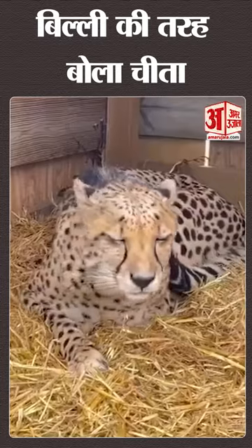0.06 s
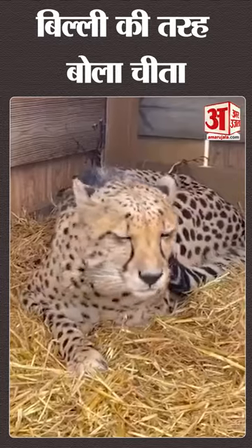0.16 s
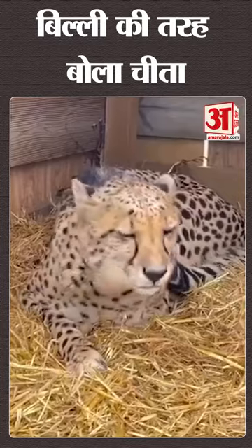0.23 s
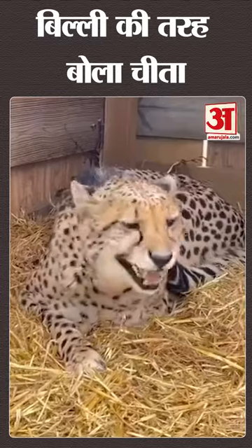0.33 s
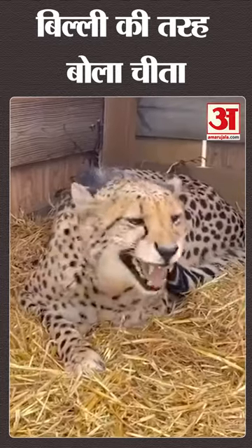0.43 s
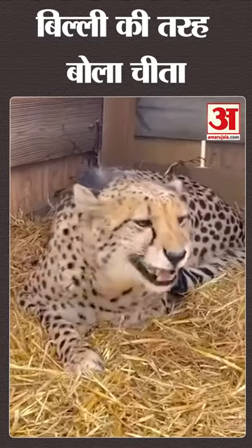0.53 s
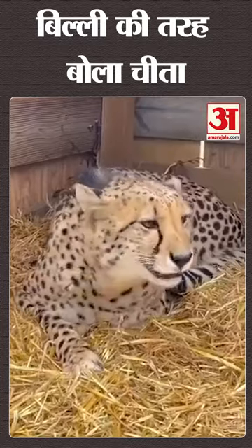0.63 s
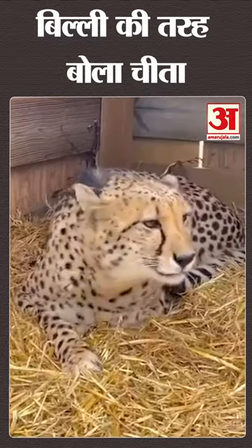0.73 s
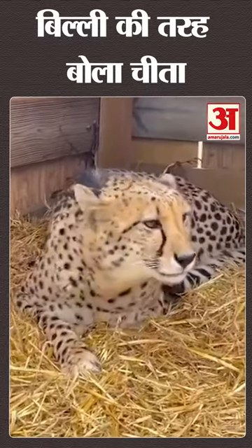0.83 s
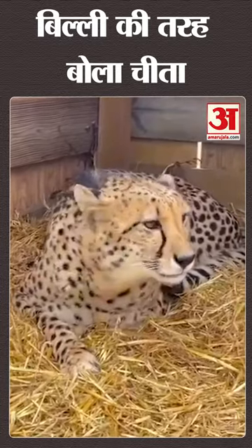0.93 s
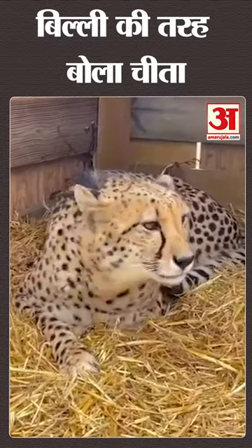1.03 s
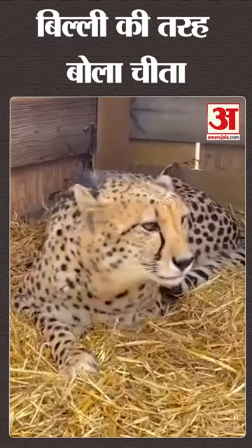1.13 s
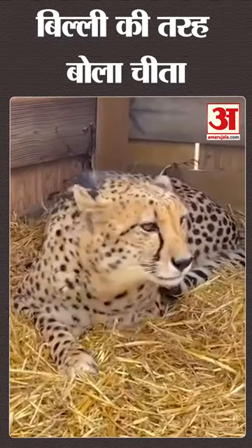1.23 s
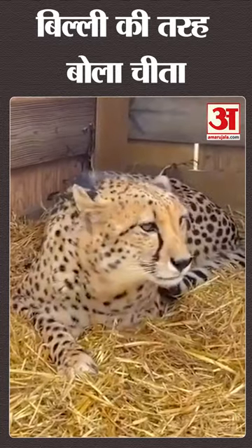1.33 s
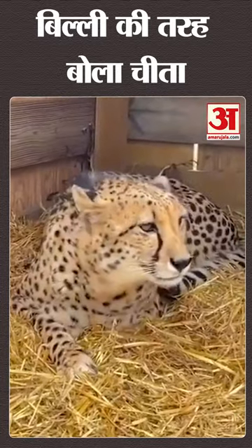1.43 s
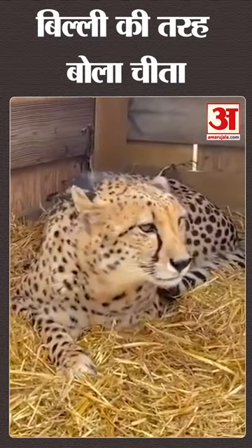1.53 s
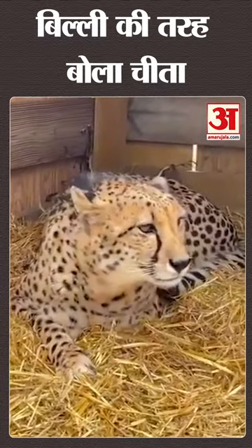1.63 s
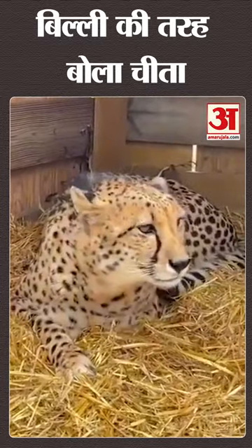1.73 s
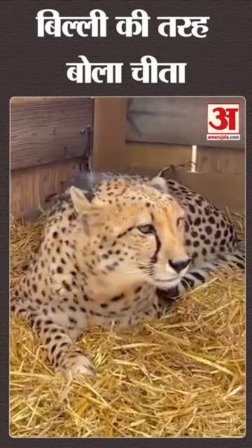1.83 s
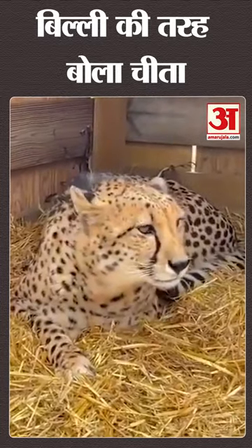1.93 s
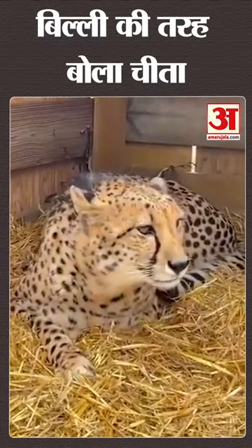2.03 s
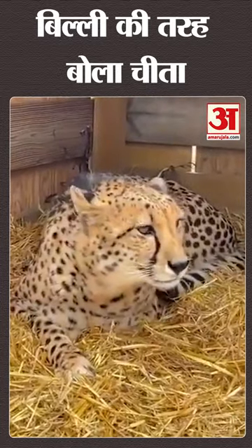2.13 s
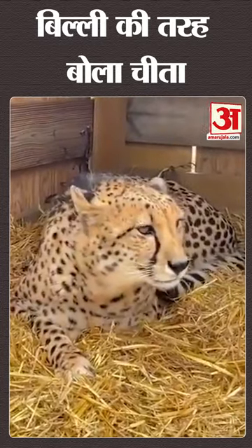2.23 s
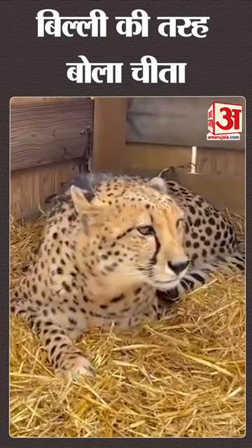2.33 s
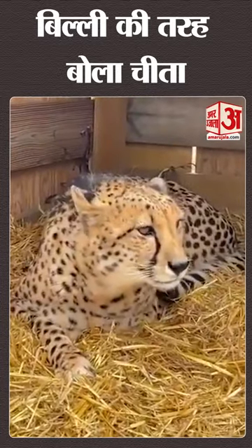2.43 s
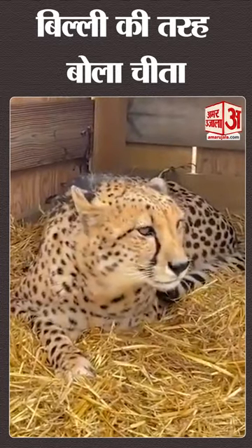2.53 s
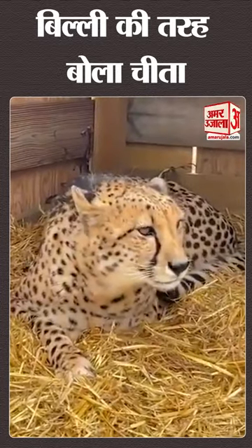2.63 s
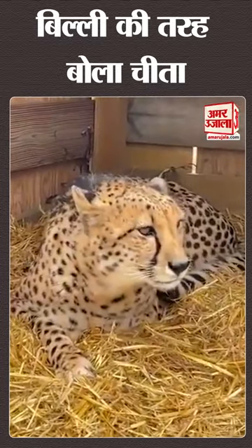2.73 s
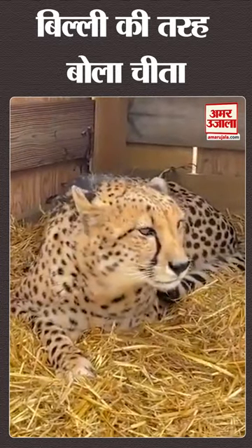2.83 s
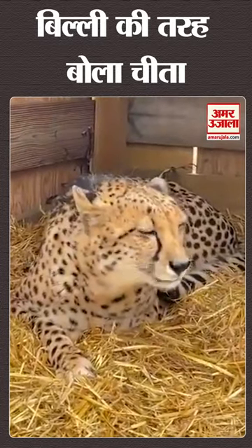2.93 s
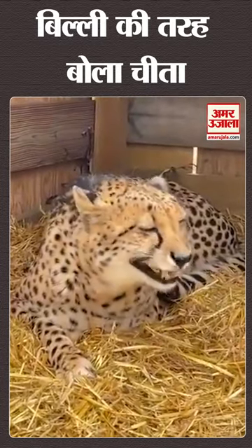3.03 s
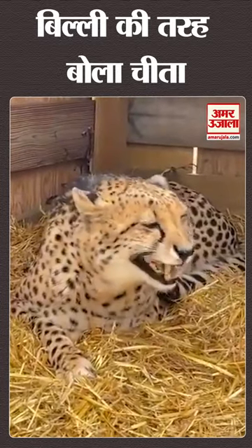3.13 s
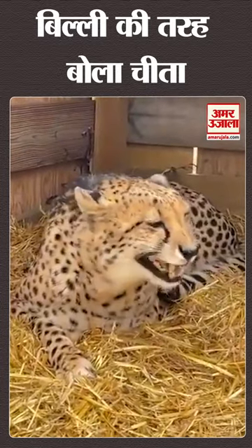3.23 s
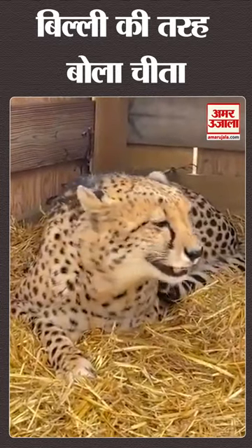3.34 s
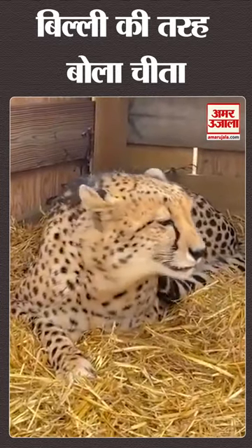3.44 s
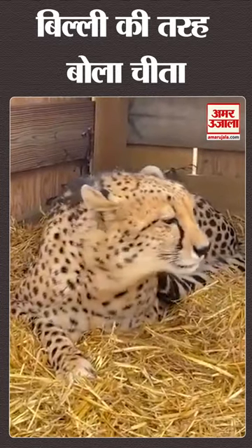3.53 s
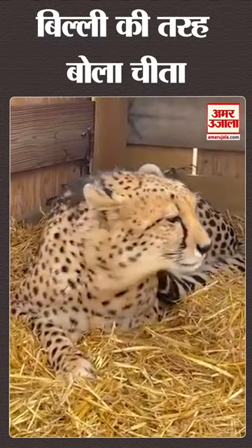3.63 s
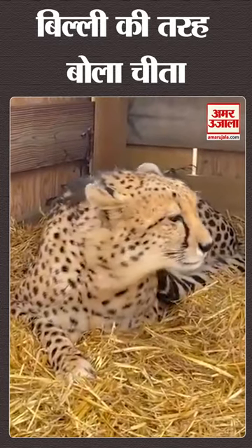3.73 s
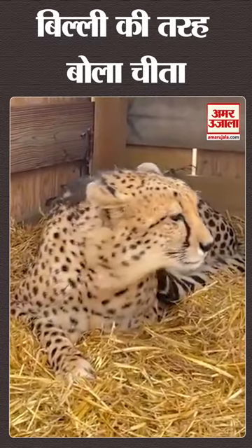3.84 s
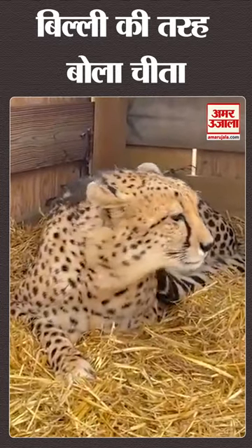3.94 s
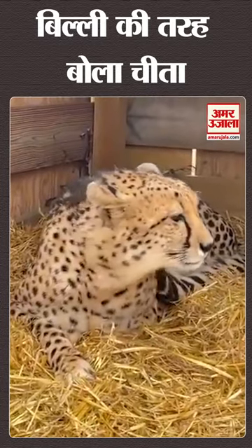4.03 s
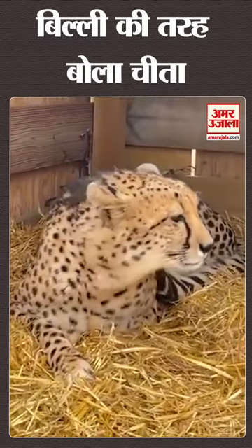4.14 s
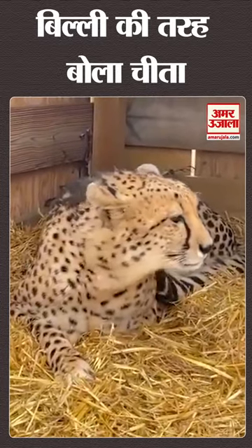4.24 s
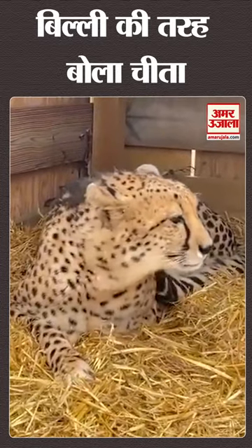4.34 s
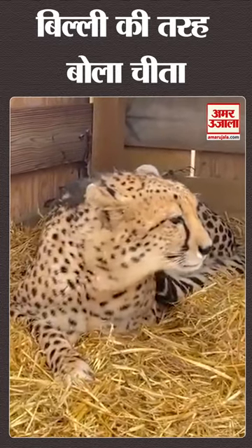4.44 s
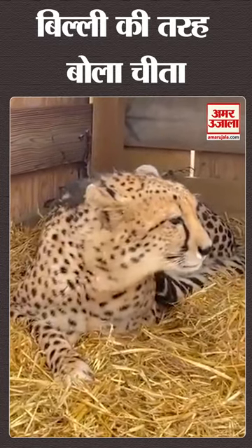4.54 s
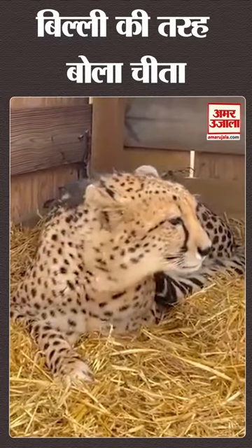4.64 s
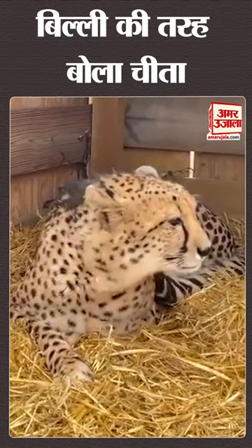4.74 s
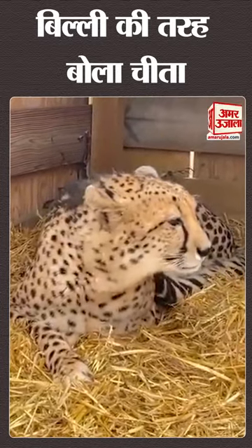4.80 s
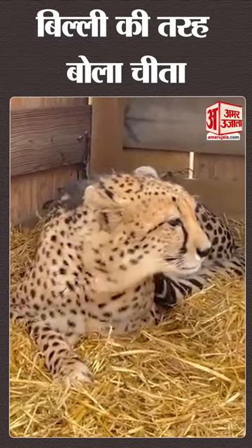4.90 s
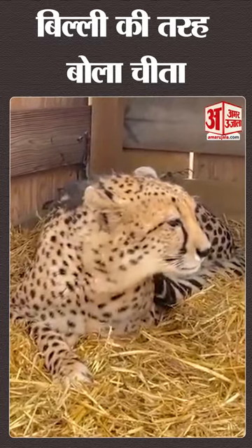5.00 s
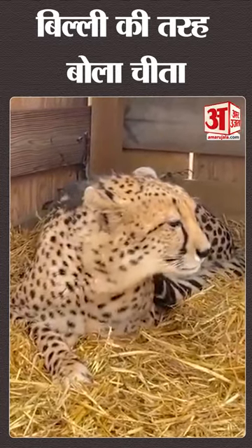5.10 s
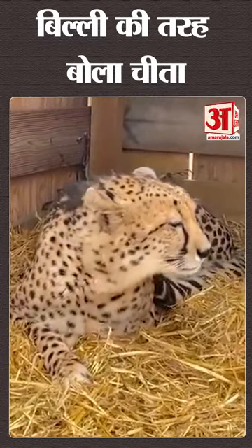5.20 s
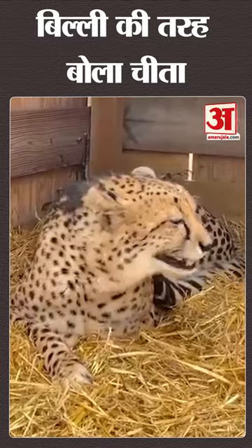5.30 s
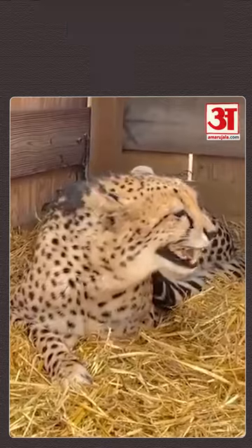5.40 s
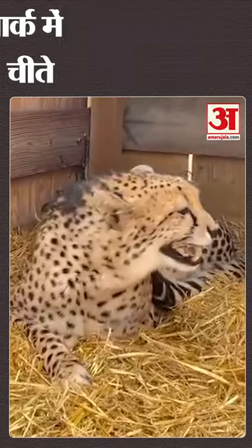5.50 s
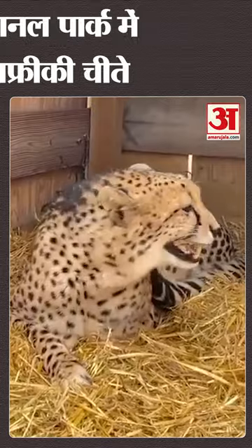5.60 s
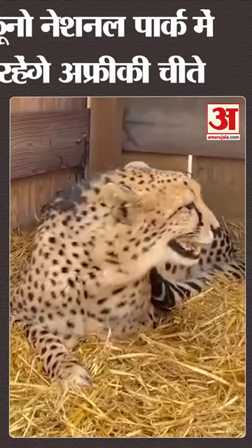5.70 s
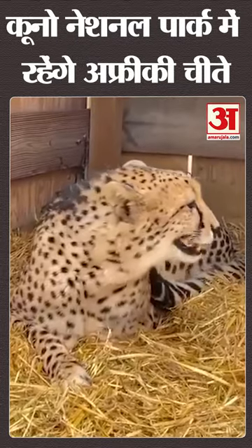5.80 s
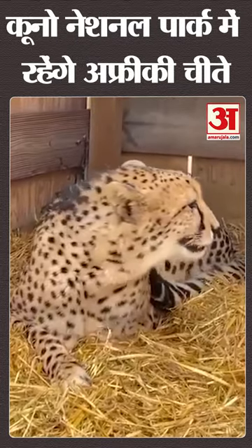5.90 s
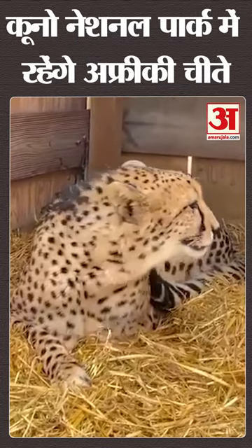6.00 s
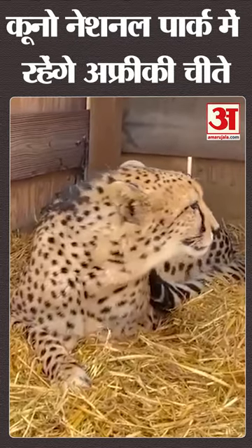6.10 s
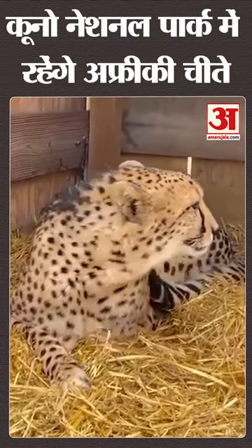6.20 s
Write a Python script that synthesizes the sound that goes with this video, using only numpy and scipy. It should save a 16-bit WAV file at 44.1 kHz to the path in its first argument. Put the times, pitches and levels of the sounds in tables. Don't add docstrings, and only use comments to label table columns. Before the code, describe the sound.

A cheetah gives three short, cat-like meows, each dropping in pitch, while a low engine hum outside fades into soft, lumpy idling.

```python
import sys
import numpy as np
from scipy import signal
from scipy.fft import rfft, irfft
from scipy.io import wavfile
from scipy.ndimage import uniform_filter1d

SR = 44100
rng = np.random.default_rng(int(sys.argv[2]) if len(sys.argv) > 2 else 0)


def master_out(mix):
    frames = np.transpose(np.atleast_2d(mix))
    ceiling = np.clip(frames, -1, 1)
    pcm = np.round(ceiling * 32767).astype(np.int16)
    wavfile.write(sys.argv[1], SR, pcm)


def rack_gain(trim_db):
    fader = np.asarray(trim_db, float)
    return 10 ** (fader / 20)


N = 276066
TIME = np.arange(N) / SR

# pitch_hz, level_db
STILL_AIR_COLOUR = [(120, -31.5), (200, -2), (274, -5.5), (320, -11), (355, -14.5), (430, -15),
                    (469, -13.5), (494, -5), (653, -13), (1060, -13.5), (12800, -28.5), (16700, -64),
                    (22000, -120)]
# time_s, firings_per_s
ENGINE_SPEED = [(0, 29.5), (.2, 28.3), (.6, 26.6), (1.2, 24.7), (1.6, 23.2), (2, 21.5), (2.4, 19.6),
                (2.6, 18.4), (2.8, 17.3), (3, 16.5), (3.4, 14.8), (3.8, 12.6), (4.2, 11.28), (4.6, 10.6),
                (5, 10.3), (5.4, 10.05), (5.8, 10.2), (6.26, 10.1)]
# time_s, level_db
DISTANCE_LOSS = [(0, -1), (1, -2), (2, -5), (2.6, -10.5), (3.2, -15), (4, -24), (6.26, -23)]
# pitch_hz, level_db
LOADED_PIPE = [(45, -10), (60, -11.5), (80, -1), (105, 2.5), (130, 2), (148, 0), (162, -19), (185, -6)]
# pitch_hz, level_db
WEAK_TONES = [(20, -54), (40, -27.5), (48, -13.5), (60, -20), (150, -16.5), (190, -29.5), (230, -23),
              (300, -42), (480, -51.5), (700, -70.5)]
# pitch_hz, width_hz, change_db_per_s
GROUND_NULLS = [(69.47, 4, -10.5), (119.34, 9.9, -13.5)]
# pitch_hz, level_db
IDLE_PIPE = [(15, -57.5), (25, -36.5), (40, -10.5), (60, -5), (86, 2), (110, -8), (146, -14.5),
             (190, -34.5), (260, -61), (400, -90.5)]
# pitch_hz, level_db
RUMBLE_COLOUR = [(8, -51.5), (25, -30.5), (40, -10.5), (60, 2), (86, -4), (130, -7.5), (190, -20),
                 (280, -29), (400, -39), (600, -69)]
# pitch_hz, level_db
WASH_TONE = [(150, -33.5), (260, -2.5), (522, -21), (745, -22.5), (1380, -25.5), (1620, -26), (2470, -33),
             (3150, -42), (9040, -55), (11000, -52), (12500, -59.5), (16200, -89.5), (22000, -120)]
# start_s, level_db, pitch_hz, length_s
STRAW_RUSTLES = [
    (.281, -41, 700, .015),
    (5.652, -50, 200, .012),
    (.975, -63, 6000, .012),
]
# time_s, pitch_hz, effort_db, mouth_closing_db_per_octave
FIRST_CALL = [(.665, 769, -48, 4), (.69, 737, -40, 2.75), (.73, 821, -42, -5), (.765, 810, -30.5, 1),
              (.788, 699, -37.5, -2.3), (.82, 633, -7, 16.5), (.865, 560.6, -20, 12),
              (.905, 590, -25.5, 22.5), (.935, 550.4, -42.6, 11.5)]
FIRST_HICCUP = [(0.944, 571.6, -46, 12), (.96, 672.7, -36.5, 19), (0.996, 670, -38.5, 15.5),
                (1.012, 601, -20.5, 32), (1.035, 539, -30.5, 21.5), (1.06, 529, -66.5, 6)]
SECOND_CALL = [(3.308, 545, -43, 2.6), (3.365, 563.4, -27.5, -4), (3.403, 655.4, -26.5, -1.8),
               (3.478, 688.4, -20, -4), (3.6, 565, -25, -6), (3.719, 523.3, -29.5, -0.3),
               (3.775, 483.3, -24, 10.5), (3.815, 419, -20.5, 9), (3.86, 404.8, -36, 14.5)]
THIRD_CALL = [(5.672, 742.7, -37.5, -1.5), (5.698, 642.6, -38, -12.5), (5.745, 762, -32, -11.5),
              (5.79, 672, -38.5, -7.5), (5.87, 600, -29.5, -5.5), (5.98, 555.5, -32.5, -5.5),
              (6.11, 543.8, -32.5, -6), (6.18, 505, -15.5, 11), (6.26, 412.8, -20.5, 8)]
# tone_2_db, tone_3_db, upper_tones_db
VOICE_BALANCE = [(5.5, 0.9, 5), (0.6, -2.5, -8), (-13.5, -16.5, -22)]
# pitch_hz, width_hz, level_db
HEAD_TURNS = [
    [(503, 60, 5.5), (617, 37, -2.5), (628, 74, -16), (1363, 230, 12), (1693, 41, 7), (1909, 57, -6.5),
     (1900, 229, 22), (2259, 62, 6.5), (2428, 146, -5.5), (2943, 353, 2.5), (3006, 58, -13.5)],
    [(435.5, 13.3, -17.5), (505.8, 15, -20), (760.3, 108.5, -26.5), (887, 65, -17), (1014, 89, 5),
     (1127, 57, 1), (1290.6, 35, 3.5), (1609, 48.1, 9.5), (2040, 57, 4), (2147, 74, -9), (2370, 290, -12.5)],
    [(484.6, 32, -23), (1014.4, 31, 17.5), (1125, 24.6, 10), (1200, 89, 18.5), (1368, 164, 6.5),
     (1402, 100, 6.5), (1660, 95, 21), (1775, 59, 4), (1960, 180, 9), (2113, 45, -16), (2706, 41, -13.5)],
]
# pitch_hz, level_db
THROAT_SHAPES = [
    [(1120, -38), (1900, -10), (2650, -14), (3050, 8.5), (3700, -29.5), (4750, -10), (6170, -32.5),
     (7000, -49), (9100, -74), (15400, -120)],
    [(1120, -31), (1900, 6.5), (2070, -0.5), (2310, -4.5), (3390, -27), (3800, -41), (4750, -36.5),
     (7000, -52), (9100, -64.5), (15400, -120)],
    [(1120, -25), (1900, 4.5), (2550, -4.5), (2780, -1.5), (3560, -34.5), (4750, -36.5), (5500, -9),
     (7000, -36.5), (9100, -46), (15400, -120)],
]
# pitch_hz, level_db
TEETH_HISS = [
    [(2180, -47), (3650, -37.5), (4000, -21.5), (4600, -11), (6250, -17.5), (6590, -27.5), (7310, -19),
     (8320, -34.5), (10600, -22), (12800, -36.5), (16700, -67.5), (22000, -120)],
    [(2180, -47.5), (3800, -27), (5320, -10), (7420, -9.5), (7860, -21), (8070, -43), (8190, -55),
     (8630, -23.5), (10600, -13.5), (12800, -14), (16700, -43), (22000, -120)],
    [(2180, -34.5), (3700, -14), (4720, -19), (5110, -11.5), (5460, -5), (6940, -22), (8800, -42),
     (10500, -11.5), (11600, -38.5), (12800, -22), (16700, -62.5), (22000, -120)],
]
# hiss_db, teeth_gap_hz, gap_shift_hz_per_pitch_hz, catch_db, top_hiss_change_db_per_s
HISS_SETTINGS = [(-45, 3800, 0.6, -1, -7), (-51, 5850, -9, 1, -47), (-58, 5700, -3, 14.5, -44.5)]
# time_s, half_length_s, roughness (0-1)
VOICE_CRACKS = [(.68, .025, .6), (.935, .03, .9), (1.03, .02, .3), (3.32, .025, .7), (3.81, .05, .25),
                (5.69, .025, .7), (5.75, .035, .5), (5.83, .015, .4), (6.22, .025, .25)]
# pitch_hz, level_db
BREATH_COLOUR = [(200, -19.5), (400, -4.5), (600, -26), (900, -43), (1300, 3), (2100, -4.5), (3200, -19),
                 (3700, -36)]
# delay_s, level_db
PLANK_ECHOES = [(.0042, -13), (.0071, -18), (.0113, -11.5), (.0168, -22.5), (.023, -10.5)]
# pitch_hz, level_db
BELT_COLOUR = [(800, -42), (1050, -4), (1250, -1), (1500, -9.5), (1900, -38)]
# top_s, level_db, rise_db_per_s, fall_db_per_s
BELT_SWELL = (2.5, -71, 28.5, 100.5)
# pitch_hz, level_db
VALVE_COLOUR = [(5290, -61.5), (9000, -32.5), (9820, -30), (10100, -11), (11100, -3), (11700, 9),
                (12800, -5.5), (16700, -24.5), (22000, -120)]


def evened(x):
    return x / np.sqrt(np.mean(x ** 2) + 1e-20)


def smoothed(x, size):
    return uniform_filter1d(uniform_filter1d(x, size=size), size=size)


def bump(x, centre, width):
    return np.exp(-((x - centre) / width) ** 2)


def drift(size):
    return evened(smoothed(rng.standard_normal(N // 64 + 1), size)).repeat(64)[:N]


def swell_db(start, hold, rise, fall):
    return np.minimum(0, np.minimum(rise * (TIME - start), fall * (start + hold - TIME)))


def read(points, hz):
    f, value = np.transpose(points)
    return np.interp(np.log(hz + 1), np.log(f + 1), value, left=-100, right=-100)


def curves(rows, t):
    s, *columns = np.transpose(rows)
    return [np.interp(t, s, c) for c in columns]


def coloured(x, points):
    size = 1 << 15
    cep = irfft(read(points, np.fft.rfftfreq(size, 1 / SR)) * np.log(10) / 20)
    cep[1:size // 2] *= 2
    cep[size // 2 + 1:] = 0
    response = irfft(np.exp(rfft(cep)))[:size // 4]
    return signal.oaconvolve(x, response)[:len(x)]


def resonate(x, hz, width):
    turn = np.exp(2j * np.pi * np.cumsum(hz) / SR)
    r = np.exp(-np.pi * width / SR)
    return (turn * signal.lfilter([1], [1, -2 * r, r * r], x / turn)).real


def hiss(points, patchy_db=1.5):
    a, b, patches = rng.standard_normal((N // 128 + 5, 257, 3)).T
    patches = uniform_filter1d(patches, size=6, axis=0)
    patches = evened(uniform_filter1d(patches, size=20, axis=1))
    colour_db = read(points, np.fft.rfftfreq(512, 1 / SR))[:, None]
    z = (a + 1j * b) * rack_gain(colour_db + patchy_db * patches)
    return evened(signal.istft(z, nperseg=512, noverlap=384)[1][:N])


def still_air():
    return rack_gain(-69.5) * hiss(STILL_AIR_COLOUR)


def engine_hum(hz, away_db, turns):
    main_db = {}
    for k in range(3, 7):
        null_db = TIME * sum(d * bump(k * hz, f, w) for f, w, d in GROUND_NULLS)
        main_db[k] = -22 + away_db + read(LOADED_PIPE, k * hz) + (k == 6) * -8.5 + null_db
    whole_db = 10 * np.log10(sum(rack_gain(db) ** 2 for db in main_db.values()))
    spread = -0.8 - 0.7 * TIME
    hum = np.zeros(N)
    for k in range(1, 24):
        if k in main_db:
            level_db = main_db[k]
        else:
            level_db = whole_db + read(WEAK_TONES, k * hz)
        if k > 6:
            level_db = level_db + 4.5 * drift(size=70) - 4 * TIME
        phase = 2 * np.pi * k * turns + 3.74 + spread * (k - 4) ** 2
        hum += np.sqrt(2) * rack_gain(level_db) * np.cos(phase)
    end_s, fade_s = 3.16, 0.68
    return hum * np.clip((end_s - TIME) / fade_s, 0, 1)


def engine_thumps(hz, turns):
    late_s, uneven_db, echo_s, echo_db = .002, 2.0, .037, -8
    fired = np.interp(np.arange(1, 110), turns, np.arange(N))
    chance = rng.standard_normal((len(fired), 2))
    places = np.clip(fired + late_s * SR * chance[:, 0], 0, N - 1).astype(int)
    pulses = np.zeros(N)
    pulses[places] = rack_gain(uneven_db * chance[:, 1])
    pulses -= rack_gain(echo_db) * np.roll(pulses, round(echo_s * SR))
    thumps = evened(coloured(pulses / np.sqrt(hz), IDLE_PIPE))
    idle_db = -41 + np.minimum(58.5 * (TIME - 2.6), 0)
    idle_db += 7 * bump(TIME, 2.9, 0.72)
    idle_db += -12 * bump(TIME, 3.6, 0.33)
    return rack_gain(idle_db) * thumps


def engine():
    hz, away_db = curves(ENGINE_SPEED, TIME)[0], curves(DISTANCE_LOSS, TIME)[0]
    turns = .97 + np.cumsum(hz) / SR
    rumble = evened(coloured(rng.standard_normal(N), RUMBLE_COLOUR))
    rumble_db = -33 + 0.49 * away_db
    return engine_hum(hz, away_db, turns) + engine_thumps(hz, turns) + rack_gain(rumble_db) * rumble


def wash():
    shut_s, shut_length_s = 1.4, .3
    shut = .5 + .5 * np.tanh((TIME - shut_s) / shut_length_s)
    level_db = -45.5 + 0.74 * curves(DISTANCE_LOSS, TIME)[0] - 14.5 * shut
    return rack_gain(level_db) * hiss(WASH_TONE)


def rustles():
    out = np.zeros(N)
    for s, db, hz, length in STRAW_RUSTLES:
        t = np.arange(4000) / SR
        band = signal.butter(2, [hz * 0.62, hz * 1.8], "bandpass", fs=SR)
        grain = evened(signal.lfilter(*band, rng.standard_normal(len(t))))
        shape = np.exp(-t / length) * np.minimum(t / 0.0052, 1)
        out[round(s * SR):][:len(t)] += rack_gain(db) * grain * shape
    return out


def voice_levels(hz, effort_db, closing_db, head, throat, balance):
    second_db, third_db, upper_db = balance
    levels = []
    for k in range(1, 16):
        if k < 4:
            own_db = (0, second_db, third_db)[k - 1]
        else:
            own_db = upper_db + read(throat, k * hz) + (k == 6) * -6.5
        level_db = effort_db + own_db - closing_db * np.log2(min(k, 5))
        if k < 7:
            level_db = level_db + sum(d * bump(k * hz, f, w) for f, w, d in head)
        levels.append(level_db)
    return levels


def voice_tones(levels, phase, at, broken_db=4.0):
    out = np.zeros(len(phase))
    for k, level_db in enumerate(levels, 1):
        if k < 4:
            shift = (k - 1) ** 2 * 1.3
        else:
            shift = (k - 4) ** 2
            level_db = level_db + broken_db * drift(size=12)[at] * min(.4 + (k - 4) / 4, 1)
        out += np.sqrt(2) * rack_gain(level_db) * np.cos(k * phase + shift)
    return out


def voice_air(levels, phase, hz, closing_db, rough, since, teeth, settings):
    hiss_db, gap_hz, shift, catch_db, dull_db = settings
    push_db = 10 * np.log10(rack_gain(levels[1]) ** 2 + rack_gain(levels[2]) ** 2) + 20
    catch = since / .06 * np.exp(1 - since / .06)
    noise = rng.standard_normal((2, len(hz)))
    breath = evened(coloured(noise[0] * (1 + 0.97 * np.cos(phase)), BREATH_COLOUR))
    rasp = evened(coloured(noise[1] * (1 + .7 * np.cos(phase)), teeth))
    ringing = evened(resonate(rasp, gap_hz + shift * (hz - hz.mean()), width=1100))
    rasp = evened(1.8 * rasp + ringing)
    top = signal.sosfiltfilt(signal.butter(4, 8345, "high", fs=SR, output="sos"), rasp)
    rasp = rasp + (rack_gain(6.0 + dull_db * since) - 1) * top
    breath_db = -48 + 0.45 * push_db + 16.5 * rough
    rasp_db = hiss_db + 0.77 * push_db - 0.26 * np.maximum(closing_db, 0) + catch_db * catch
    return rack_gain(breath_db) * breath + rack_gain(rasp_db) * rasp


def call(rows, head, throat, teeth, balance, settings):
    attack_s, release_s, release_db_per_s = 0.0098, .06, 597
    jitter, crack_jitter, crack_depth, flutter_db = .003, 6.0, 0.48, .9
    start_s, end_s = rows[0][0], rows[-1][0]
    at = slice(round(start_s * SR), min(round((end_s + release_s) * SR), N))
    t = TIME[at]
    since = t - start_s
    hz, effort_db, closing_db = uniform_filter1d(curves(rows, t), size=500, axis=1)
    effort_db = effort_db - release_db_per_s * np.maximum(t - end_s, 0)
    rough = sum(r * bump(t, s, w) for s, w, r in VOICE_CRACKS if start_s < s < end_s)
    noise = rng.standard_normal((3, len(t)))
    shake, flutter = [evened(smoothed(v, 250)) for v in noise[:2]]
    crackle = 1 + crack_depth * rough * evened(smoothed(noise[2], 150))
    shaky_hz = hz * (1 + jitter * (1 + crack_jitter * rough) * shake)
    phase = 2 * np.pi * np.cumsum(shaky_hz) / SR
    levels = voice_levels(hz, effort_db, closing_db, head, throat, balance)
    tones = voice_tones(levels, phase, at) * rack_gain(flutter_db * flutter) * crackle
    air = voice_air(levels, phase, hz, closing_db, rough, since, teeth, settings)
    return at, (tones + air) * np.minimum(since / attack_s, 1)


def cat():
    out = np.zeros(N)
    calls = [FIRST_CALL + FIRST_HICCUP, SECOND_CALL, THIRD_CALL]
    for parts in zip(calls, HEAD_TURNS, THROAT_SHAPES, TEETH_HISS, VOICE_BALANCE, HISS_SETTINGS):
        at, sound = call(*parts)
        out[at] = sound
    return out


def shelter(x, wet_db=-6, tail_db=-26, die_away_s=.2):
    t = np.arange(SR // 2) / SR
    tail = rng.standard_normal(len(t)) * rack_gain(-60 * t / die_away_s) * (t > .012)
    taps = evened(tail) * rack_gain(tail_db) / np.sqrt(len(t))
    taps[0] = 1
    for k, (s, db) in enumerate(PLANK_ECHOES):
        taps[round(s * SR)] += (-1) ** k * rack_gain(db + wet_db)
    return signal.oaconvolve(x, taps / np.linalg.norm(taps))[:N]


def belt_whine():
    top_s, level_db, rise, fall = BELT_SWELL
    return rack_gain(level_db + swell_db(top_s, .25, rise, fall)) * hiss(BELT_COLOUR)


def valve_puff():
    return rack_gain(-56.5 + swell_db(3.045, hold=.06, rise=1199.5, fall=499)) * hiss(VALVE_COLOUR)


def scene():
    outside = still_air() + engine() + wash() + belt_whine() + valve_puff()
    return (outside + rustles() + shelter(cat()))[None]


def low_pass(x):
    return signal.sosfilt(signal.butter(12, 12960, fs=SR, output="sos"), x)


def record(dry):
    return low_pass(dry)


dry = scene()
out = record(dry)
master_out(out)
```